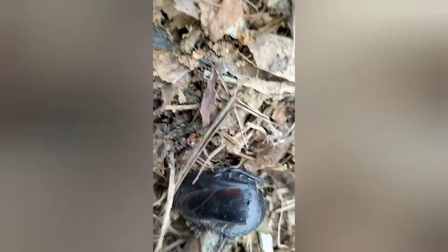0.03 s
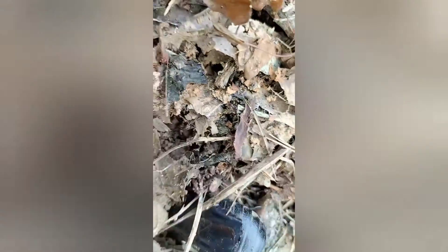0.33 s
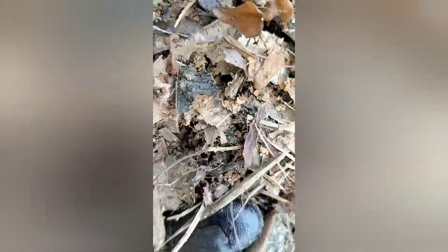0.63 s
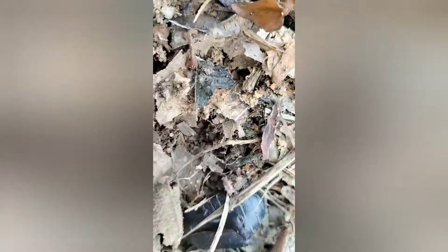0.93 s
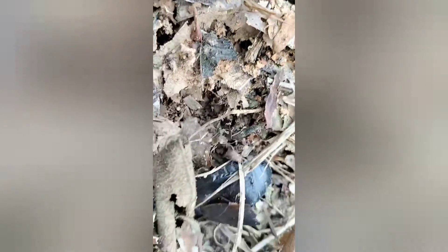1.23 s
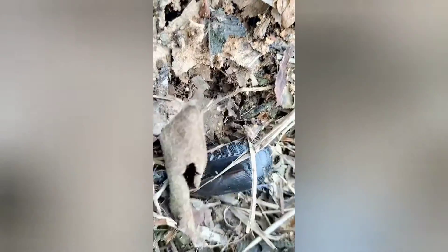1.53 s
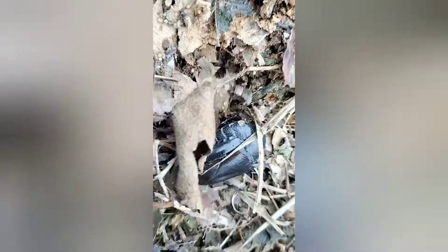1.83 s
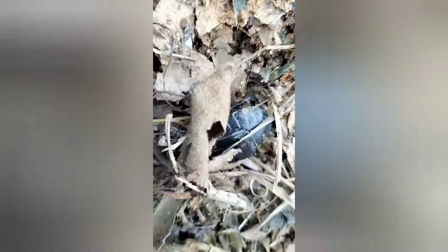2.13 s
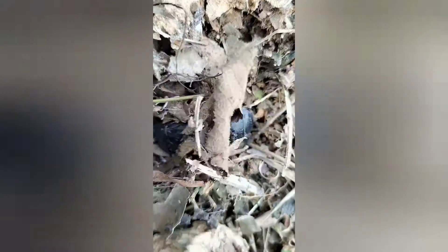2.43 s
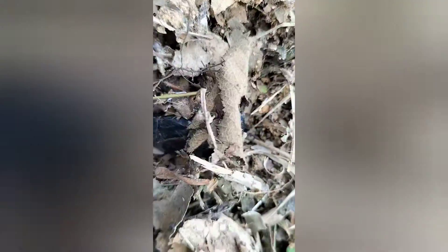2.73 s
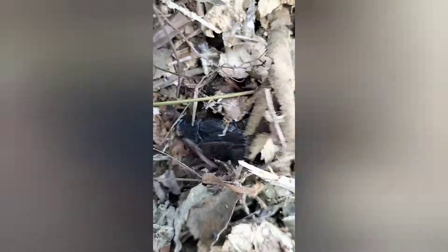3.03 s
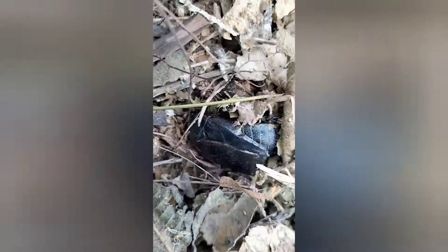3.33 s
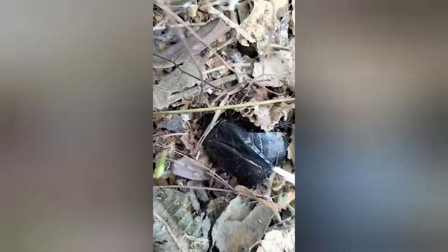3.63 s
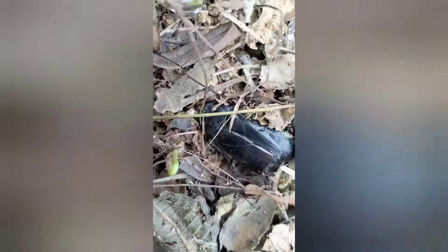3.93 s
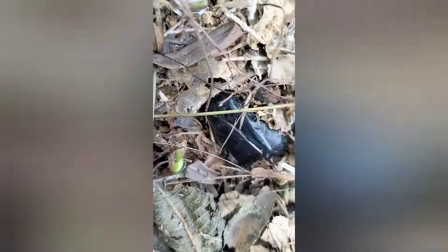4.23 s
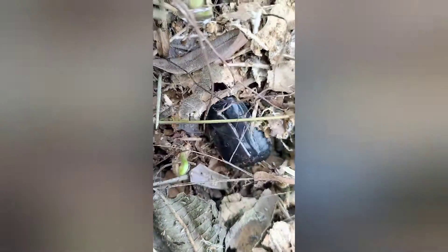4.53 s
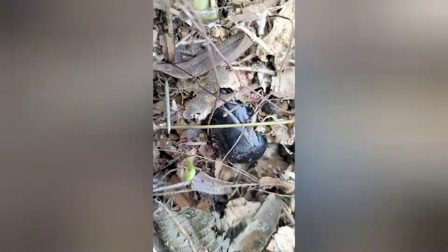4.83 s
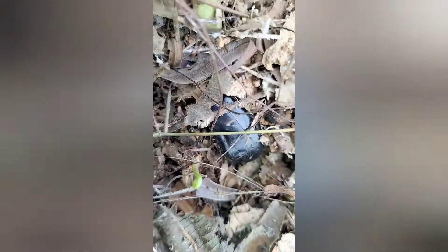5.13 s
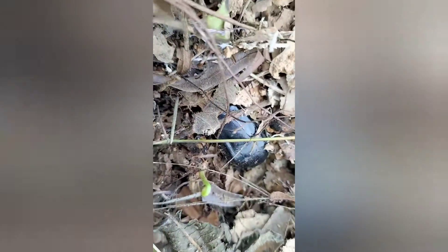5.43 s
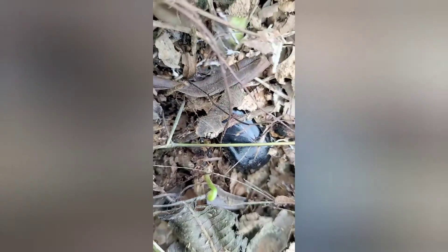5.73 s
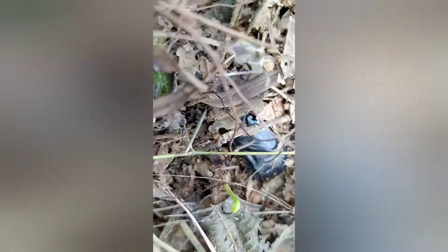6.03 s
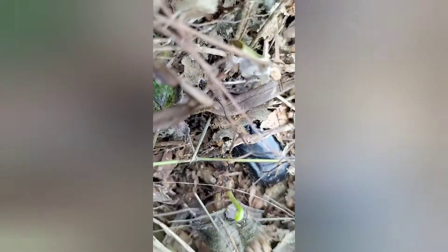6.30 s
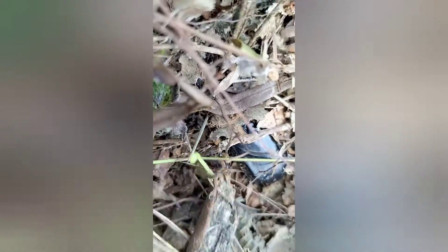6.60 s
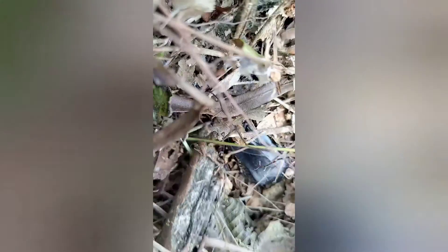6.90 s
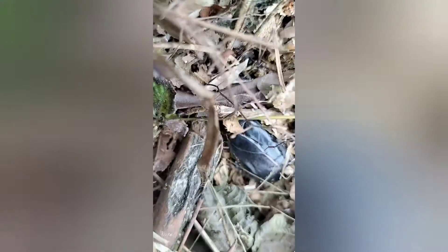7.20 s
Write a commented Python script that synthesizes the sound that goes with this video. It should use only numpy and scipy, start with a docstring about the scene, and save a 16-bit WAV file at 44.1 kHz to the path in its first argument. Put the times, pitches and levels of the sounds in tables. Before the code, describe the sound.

Quiet, irregular rustling and ticking of dead leaves and stalks is heard very close as a beetle pushes over the ground, with faint outdoor hiss behind and no echo. The small crackles come and go with short lulls. Then a much louder run of crunching leaves, sharp snaps and dull twig knocks lasts under a second, and a stick scrapes briefly and softly.

```python
"""A large beetle crawls through dry leaf litter, a hand's width below a phone, outdoors in still air. Leaves
crumple in showers of tiny fractures, fibres snap, claws scratch, stalks twang and cloth rubs close to the
microphone in soft swishes over a faint hiss and two distant whistles. Near the end the litter is pressed down
right beside the microphone: loud crunches, dull twig knocks and a last scrape of a stick."""
import sys
import numpy as np
from scipy import signal
from scipy.fft import rfft, irfft
from scipy.io import wavfile

SR = 44100
rng = np.random.default_rng(int(sys.argv[2]) if len(sys.argv) > 2 else 0)


def put_to_file(sound):
    """Save the sound as 16-bit audio at rate SR, in the file named by the first command-line argument."""
    columns = np.atleast_2d(sound).T  # one column per channel
    safe = np.clip(columns, -1, 1)
    whole_steps = np.round(safe * 32767)
    wavfile.write(sys.argv[1], SR, whole_steps.astype(np.int16))


N = 324576
FFT_SIZE = 4096
FREQS_HZ = np.maximum(np.arange(FFT_SIZE // 2 + 1) * SR / FFT_SIZE, 1)
TIME_S = np.arange(N) / SR

# Spectrum of a brittle fibre. Each row: frequency in Hz, relative level in dB.
FIBRE_SPECTRUM = [(100, -16), (600, 7), (1300, 2), (1850, -0.5), (2800, 0.5), (4500, -2.5), (7600, -0.5),
                  (9500, -22.5), (15000, -11.5)]
# Spectrum of a scratch on a leaf. Each row: frequency in Hz, relative level in dB.
SCRATCH_SPECTRUM = [(100, -43), (900, 2), (1800, -2.5), (3200, 5), (5000, 0.5), (7300, 0.5), (9300, -25.5),
                    (15000, -12.5)]


def undb(db):
    """Decibels to gain."""
    return 10 ** (np.asarray(db) / 20)


def unit(x, samples=None):
    """Scale to rms 1, as if all the energy lay in this many samples."""
    return x / np.sqrt(np.sum(x ** 2) / (samples or len(x)) + 1e-18)


def add(out, start_s, sound):
    """Mix a sound in at start_s."""
    start = max(int(start_s * SR), 0)
    part = out[start:start + len(sound)]
    part += sound[:len(part)]


def spectrum(points):
    """Join (Hz, dB) points on a log-frequency axis."""
    hz, db = np.transpose(points)
    return np.interp(np.log(FREQS_HZ), np.log(hz), db)


def hump(hz):
    """Broad spectral hump: 0 at hz, -1 half an octave away."""
    return -np.log2(1 + (2 * np.log2(FREQS_HZ / hz)) ** 2)


def ripple(count=130):
    """Random resonances of one leaf, spread near 1."""
    knots = rng.standard_normal(count)
    return np.interp(np.sqrt(FREQS_HZ / FREQS_HZ[-1]), np.linspace(0, 1, count), knots)


def wander(rate_hz):
    """Random drift in time, spread near 1."""
    knots = rng.standard_normal(int(rate_hz * N / SR) + 2)
    return np.interp(TIME_S * rate_hz, np.arange(len(knots)), knots)


def colour(x, db):
    """Minimum-phase filter with this dB spectrum."""
    cepstrum = irfft(np.log(undb(db)))
    cepstrum[1:FFT_SIZE // 2] *= 2
    cepstrum[FFT_SIZE // 2 + 1:] = 0
    response = irfft(np.exp(rfft(cepstrum)))[:FFT_SIZE // 2]
    return signal.fftconvolve(x, response)


def grains(samples, rate_hz, spread_db):
    """Impulses at random moments, most weak, a few strong."""
    timing, strength, polarity = rng.random((samples, 3)).T
    sizes = undb(-spread_db * np.log(np.maximum(strength, np.exp(-4))))
    return unit((timing < rate_hz / SR) * sizes * np.sign(polarity - .5))


def air(hiss_db=-67.5, murmur_db=-72):
    """Steady faint hiss over a low murmur of barely stirring air."""
    # Each row: frequency in Hz, relative level in dB.
    hiss_spectrum = [(25, -8), (60, -10.5), (110, -2), (250, 1.5), (600, -13), (1300, -4.5), (1900, -14),
                     (2450, -4.5), (3100, -10.5), (4000, -1.5), (5100, -1), (7200, -23.5), (9000, -79),
                     (15000, -22)]
    murmur_spectrum = [(30, -6), (110, -1.0), (280, -7), (700, -11.5), (3000, -38)]
    hiss = unit(colour(rng.standard_normal(N), spectrum(hiss_spectrum))[:N])
    murmur = unit(colour(rng.standard_normal(N), spectrum(murmur_spectrum))[:N])
    stir_db = 1.2 * wander(rate_hz=6)
    return undb(hiss_db) * hiss + undb(murmur_db + stir_db) * murmur


def whistles():
    """Distant airy whistles: narrow noise bands fading in and out."""
    # Each row: start in seconds, length in seconds, pitch in Hz, half-width in Hz, level in dB.
    events = [(.88, .18, 1180, 130, -73), (4.33, .6, 2450, 90, -79)]
    out = np.zeros(N)
    for start_s, length_s, hz, width_hz, db in events:
        band_db = -20 * np.log10(1 + ((FREQS_HZ - hz) / width_hz) ** 4)
        tone = unit(colour(rng.standard_normal(SR), band_db))
        swell = np.hanning(int(length_s * SR)) ** .5
        add(out, start_s, undb(db) * swell * tone[:len(swell)])
    return out


def rustle_db(crawl_db=-76, attack_s=0.032, arch_db=1.5, release_s=0.046, settle_db=-10.5, settle_s=0.14):
    """Level of cloth rustling close to the microphone: each rub builds, lets go and settles over a steady faint
    rustle."""
    # Each row: start in seconds, length in seconds, level in dB.
    rubs = [(0.204, 0.08, -61.5), (0.32, 0.16, -55.5), (0.545, 0.25, -64), (1.942, 0.28, -60),
            (2.27, 0.089, -63.5), (2.381, 0.063, -54.5), (2.499, 0.24, -60), (2.984, 0.052, -46),
            (4.102, 0.15, -65.5), (4.95, 0.19, -66.5), (5.597, 0.096, -56), (5.8, 0.22, -63),
            (5.99, 0.22, -59), (6.814, 0.072, -50.5), (6.967, 0.075, -57.5), (7.196, 0.079, -59)]
    power = undb(crawl_db) ** 2
    for start_s, length_s, db in rubs:
        t = TIME_S - start_s
        before_s, after_s = np.maximum(-t, 0), np.maximum(t - length_s, 0)
        swell_db = arch_db * (np.sin(np.pi * np.clip(t / length_s, 0, 1)) - .5)
        release = np.maximum(np.exp(-after_s / release_s), undb(settle_db) * np.exp(-after_s / settle_s))
        power = power + (undb(db + swell_db) * np.exp(-before_s / attack_s) * release) ** 2
    return 10 * np.log10(power)


def swishes(cloth_db, ripple_db=6.5, drift_db=2, prickle_db=-9.5, flicker_db=1):
    """Three layers of cloth rub close to the microphone: fine grains merge into a bright swish; catching fibres
    prickle."""
    # Each row: frequency in Hz, relative level in dB.
    swish_spectrum = [(40, -11), (250, -1.5), (900, -10), (1800, -14.5), (2400, -14), (3400, -5), (4150, 2),
                      (4800, -6.5), (6200, -3), (7200, -1), (8200, -9.5), (9400, -21.5), (11000, -20),
                      (15000, -15)]
    swish = 0
    for _ in range(3):
        friction = grains(N, rate_hz=2200, spread_db=5.5)
        surface = colour(friction, spectrum(swish_spectrum) + ripple_db * ripple())[:N]
        swish = swish + unit(surface) * undb(drift_db * wander(rate_hz=6))
    catches = grains(N, rate_hz=140, spread_db=6.2)
    prickle = colour(catches, spectrum(SCRATCH_SPECTRUM) + ripple_db * ripple())[:N]
    mix = unit(swish) + undb(prickle_db) * unit(prickle)
    return unit(mix) * undb(cloth_db + flicker_db * wander(rate_hz=33))


def footfalls(cloth_db, level_db=-73, follow=0.24, scratch_s=0.00072, focus_db=4, ripple_db=3):
    """Claws scratch twelve leaves of different pitch, harder while the cloth rustles."""
    leaves, t = 0, np.arange(SR // 100) / SR
    for hz in np.geomspace(2800, 13000, 12):
        scratch = np.exp(-t / scratch_s) * rng.standard_normal(len(t))
        steps = signal.fftconvolve(grains(N, rate_hz=3, spread_db=4), scratch)
        leaf_db = spectrum(SCRATCH_SPECTRUM) + focus_db * hump(hz) + ripple_db * ripple()
        leaves = leaves + unit(colour(steps, leaf_db)[:N])
    return unit(leaves) * undb(level_db + follow * (cloth_db - np.median(cloth_db)))


def stalks(half_width_hz=130, slip_s=0.01, rasp_db=-18, gain_db=-1):
    """A stiff stalk slips off the beetle's leg and rings in its bending modes."""
    # Each row: start in seconds, relative level in dB, pitch in Hz.
    events = [(0.212, -46.5, 3200), (0.24, -47, 2890), (1.087, -46.5, 3430), (1.11, -44.5, 2850),
              (1.127, -43, 3060), (1.168, -50.5, 3400), (1.934, -41.5, 3300), (4.123, -54, 2750),
              (4.136, -42.5, 3570), (4.138, -45, 2170), (4.957, -54.5, 2720), (5.024, -54, 2020),
              (5.061, -53, 3350), (5.111, -54, 3570)]
    # Each row: multiple of the pitch, relative level in dB.
    bending_modes = [(.35, -25), (.66, -7), (.84, -17), (1, 14), (1.03, -4), (1.25, -6)]
    out, t = np.zeros(N), np.arange(SR // 30) / SR
    for start_s, db, hz in events:
        slip = np.exp(-t / slip_s) * rng.standard_normal(len(t))
        resonance = sum(undb(mode_db) / (1 + ((FREQS_HZ - hz * multiple) / half_width_hz) ** 2)
                        for multiple, mode_db in bending_modes)
        twang = colour(slip, 20 * np.log10(resonance + undb(rasp_db)) + spectrum(FIBRE_SPECTRUM))
        add(out, start_s, undb(db + gain_db) * unit(twang, samples=353))
    return out


def scrape():
    """A stick drags over the litter; dense catches ring its modes."""
    # Each row: time in seconds, level in dB.
    envelope = [(7.04, -110), (7.075, -60), (7.098, -39.5), (7.16, -40), (7.188, -39), (7.215, -49),
                (7.27, -63), (7.35, -62.5)]
    # Each row: frequency in Hz, width in Hz, relative level in dB.
    stick_modes = [(333, 83, 2), (914, 400, -7), (1210, 150, -10), (1430, 290, -2), (2460, 220, -10),
                   (2780, 690, -16), (3550, 570, -11.5), (5680, 500, -20.5), (7970, 410, -23)]
    power = sum(undb(db) ** 2 / (1 + (2 * (FREQS_HZ - hz) / width_hz) ** 2) ** 1.88
                for hz, width_hz, db in stick_modes)
    catches = grains(N, rate_hz=2500, spread_db=4)
    level_db = np.interp(TIME_S, *np.transpose(envelope))
    return unit(colour(catches, 10 * np.log10(power))[:N]) * undb(level_db)


def knocks(overtone_ratio=1.715, overtone_db=-8, contact_s=0.0014, gain_db=-2):
    """A twig bumps another or the soil and rings in two heavily damped modes."""
    # Each row: start in seconds, relative level in dB, pitch in Hz, T60 in seconds.
    events = [(0.0991, -44.5, 452, 0.053), (0.7607, -50.5, 1040, 0.0079), (1.1763, -49, 418, 0.077),
              (1.9337, -43, 900, 0.028), (2.257, -53.5, 326, 0.044), (2.6825, -42, 680, 0.059),
              (2.7107, -39, 1156, 0.012), (2.716, -42, 634, 0.06), (4.1392, -43.5, 431, 0.046),
              (5.117, -37, 316, 0.018), (6.1302, -28.5, 676, 0.004), (6.1672, -35.5, 634, 0.0083),
              (6.177, -35.5, 710, 0.0065), (6.1993, -33.5, 850, 0.0074), (6.215, -38, 580, 0.0025),
              (6.2421, -24.5, 660, 0.0093), (6.2659, -37, 870, 0.0093), (6.2775, -30, 570, 0.0062),
              (6.4025, -19.5, 570, 0.0026), (6.5115, -14, 1290, 0.0043), (6.5401, -17, 790, 0.0061),
              (6.579, -17.5, 328, 0.016), (6.6125, -25, 710, 0.013), (6.6589, -20.5, 738, 0.035),
              (6.6909, -18.5, 216, 0.07), (6.802, -29, 204, 0.076), (6.828, -24.5, 330, 0.016),
              (6.9154, -16.5, 268, 0.027), (6.9322, -29, 348, 0.052), (7.0315, -17, 348, 0.063),
              (7.0358, -16.5, 830, 0.0045), (7.0434, -23.5, 300, 0.025)]
    out, t = np.zeros(N), np.arange(SR // 8) / SR
    for start_s, db, hz, t60_s in events:
        phase = 2 * np.pi * hz * t
        modes = np.cos(phase) + undb(overtone_db) * np.cos(overtone_ratio * phase)
        ring = -modes * np.exp(-np.log(1000) * t / t60_s) * (1 - np.exp(-t / contact_s))
        # A thin twig radiates little below its pitch.
        ring = signal.sosfilt(signal.butter(2, hz / 2, "high", fs=SR, output="sos"), ring)
        add(out, start_s, undb(db + gain_db) * unit(ring, samples=264))
    return out


def snaps(tear_s=0.00038, splinter_s=0.00069, fray_gain=0.16, focus_db=5.5, ripple_db=4, gain_db=-1):
    """A brittle fibre tears, breaks sharply and splinters, strongest round its own pitch."""
    # Each row: break time in seconds, relative level in dB, pitch in Hz.
    events = [(0.0098, -49.5, 3700), (0.0215, -43.5, 3570), (0.0374, -50, 3630), (0.0445, -37, 3700),
              (0.0515, -39.5, 3740), (0.0606, -43, 3640), (0.0714, -39, 2700), (0.0946, -41, 2140),
              (0.185, -44, 2080), (0.2015, -49, 11000), (0.4642, -49, 6460), (0.7611, -40.5, 3300),
              (0.985, -55, 6450), (1.124, -48, 11700), (1.8905, -53.5, 6900), (1.9258, -44.5, 4330),
              (1.9345, -37, 2980), (1.9419, -45.5, 8240), (1.95, -57, 12000), (2.0122, -43, 3370),
              (2.395, -49, 7000), (2.4046, -44, 8050), (2.4326, -37, 7160), (2.443, -43, 8500),
              (2.519, -48, 2460), (2.6729, -35, 7050), (2.7002, -40, 6300), (2.7098, -32, 3600),
              (2.7096, -33.5, 10200), (2.845, -45.5, 3700), (3.2924, -51, 3000), (3.4294, -51.5, 3900),
              (3.497, -46, 4100), (3.582, -54, 6450), (3.708, -56.5, 1970), (4.04, -55.5, 3740),
              (4.138, -44, 2900), (4.1748, -51, 3860), (4.2278, -57, 5000), (5.0028, -48, 7300),
              (6.002, -45, 6700), (6.027, -40.5, 5340), (6.0639, -51.5, 2190), (6.1304, -37.5, 2400),
              (6.228, -57, 11000), (6.4021, -23, 3070), (6.4376, -15.5, 3060), (6.4671, -20, 3030),
              (6.5058, -24, 3500), (6.5403, -19, 2130), (6.5465, -18, 4100), (6.718, -29, 3170),
              (6.7602, -38.5, 3430), (6.8272, -27, 2970), (6.8378, -30, 3040), (6.918, -22, 3150),
              (7.0275, -14, 2900), (7.0375, -22, 3060), (7.0454, -26, 2550), (7.2608, -45.5, 6000)]
    out, t = np.zeros(N), np.arange(-(SR // 300), SR // 100) / SR
    for break_s, db, hz in events:
        fraying = np.exp(-np.abs(t) / np.where(t < 0, tear_s, splinter_s))
        crack = fray_gain * fraying * rng.standard_normal(len(t)) - (t == 0)  # impulse at the break
        snap = colour(crack, spectrum(FIBRE_SPECTRUM) + focus_db * hump(hz) + ripple_db * ripple())
        add(out, break_s + t[0], undb(db + gain_db) * unit(snap, samples=132))
    return out


def crunches(arch=0.033, rub_gain=0.37, ripple_db=4.5, gain_db=-2):
    """Leaves crumple in a shower of fractures; a heavier press also shakes the hollows and the ground."""
    # Each row: start in seconds, length in seconds, relative level in dB, ground thud in dB, treble in dB.
    events = [(0.015, 0.099, -53.5, 0, -3), (0.175, 0.048, -48, -1, -4), (1.121, 0.065, -53.5, -5, 0),
              (1.922, 0.02, -47, 0.5, -12), (2.379, 0.028, -50.5, -5, -6), (2.413, 0.033, -45.5, -14, 6.5),
              (2.492, 0.075, -56, -14, 0), (2.672, 0.061, -47, 9, 6), (2.94, 0.11, -42, -1, 3),
              (4.131, 0.014, -43, -5, 0), (4.155, 0.035, -53.5, 5, -1), (5.094, 0.034, -46.5, 4.5, 0.5),
              (6.015, 0.033, -50.5, -1.5, 6), (6.13, 0.053, -39.5, 7, -9), (6.184, 0.085, -40.5, 16, -5),
              (6.287, 0.022, -42, 11, 4.5), (6.353, 0.052, -47.5, 16, 2), (6.403, 0.0056, -20, 19.5, 7),
              (6.419, 0.012, -21, 7, 1), (6.437, 0.016, -16, 1.5, 1.5), (6.458, 0.015, -18, 6, -1.5),
              (6.474, 0.033, -23.5, 2, -2), (6.503, 0.012, -12.5, 7, 0.5), (6.51, 0.02, -22.5, 18, -1),
              (6.534, 0.017, -12, 7, 4), (6.548, 0.02, -27, 17, -3), (6.569, 0.011, -17.5, -1.5, -2),
              (6.58, 0.05, -25, 10, -0.5), (6.603, 0.0069, -12.5, 0, -3.5), (6.648, 0.039, -19, 1.5, -3),
              (6.684, 0.023, -26, 1.5, 3), (6.707, 0.075, -45.5, 7, 2.5), (6.796, 0.016, -38.5, 3, 9),
              (6.82, 0.034, -35, 16, -7), (6.864, 0.084, -42.5, 4, -6), (6.91, 0.015, -23, 1, -2),
              (6.943, 0.099, -49, 19, 6.5), (7.018, 0.011, -23.5, -5, -1), (7.031, 0.0086, -16.5, 10, -29),
              (7.049, 0.035, -42.5, 12, 1)]
    # Each row: frequency in Hz, relative level in dB.
    leaf_spectrum = [(40, -48), (75, -20), (120, -3.5), (230, -3.5), (550, -5), (1100, 2), (1950, -10),
                     (3200, -6), (4400, -11.5), (5500, -10), (7600, -17), (9200, -42.5), (11000, -40),
                     (15000, -34.5)]
    # Curled leaves and the hollows under them. Each row: frequency in Hz, width in Hz, lift in dB.
    litter_modes = [(426, 105, 4.5), (722, 48, 1.5), (1120, 87, 2.5), (1490, 52, 3), (2635, 230, 5),
                    (3510, 180, 4.5), (7300, 320, 5.5)]
    lift_db = sum(db * np.exp(-.5 * ((FREQS_HZ - hz) / width_hz) ** 2) for hz, width_hz, db in litter_modes)
    leaf_db = spectrum(leaf_spectrum) + lift_db
    out = np.zeros(N)
    for start_s, length_s, db, thud_db, treble_db in events:
        edge_s = min(.0013 + .07 * length_s, .007)  # a long press builds and lets go slowly
        t = np.arange(int((length_s + 6 * edge_s) * SR)) / SR - 3 * edge_s
        press = 1 / (1 + np.exp(-2 * t / edge_s)) / (1 + np.exp(2 * (t - length_s) / edge_s))
        press *= 1 - arch * np.cos(np.pi * np.clip(t / length_s, 0, 1)) ** 2  # hardest in the middle
        fractures = grains(SR // 2, rate_hz=3600, spread_db=6)
        shower = (fractures + rub_gain * rng.standard_normal(SR // 2))[:len(t)]
        hollow_db = 0.79 * thud_db - 2
        tone_db = spectrum([(100, 0), (240, thud_db), (340, thud_db), (600, hollow_db), (1250, hollow_db),
                            (2000, 0), (3700, 0.005), (5200, treble_db)])
        crunch = colour(press * shower, leaf_db + tone_db + ripple_db * ripple())
        add(out, start_s - 3 * edge_s, undb(db + gain_db) * unit(crunch, samples=length_s * SR))
    return out


def scene():
    """Litter close to one microphone, air and whistles behind; no echo."""
    cloth_db = rustle_db()
    litter = crunches() + snaps() + knocks() + stalks() + scrape() + swishes(cloth_db) + footfalls(cloth_db)
    return (litter + whistles() + air())[None]


def record(dry, drive=.7, low_cut_hz=75, high_cut_hz=15850):
    """The phone rounds the highest peaks, thins the bass and cuts the top."""
    rounded = np.tanh(drive * dry) / drive
    thin = signal.sosfilt(signal.butter(2, low_cut_hz, "high", fs=SR, output="sos"), rounded)
    return signal.sosfilt(signal.ellip(10, .2, 70, high_cut_hz, fs=SR, output="sos"), thin)


dry = scene()
out = record(dry)
put_to_file(out)
```